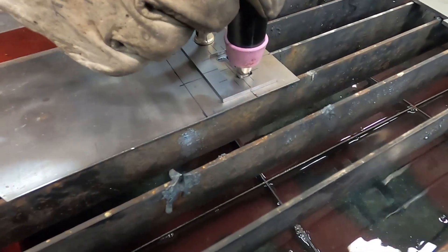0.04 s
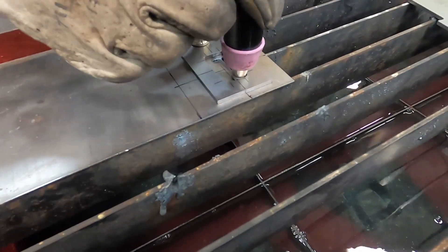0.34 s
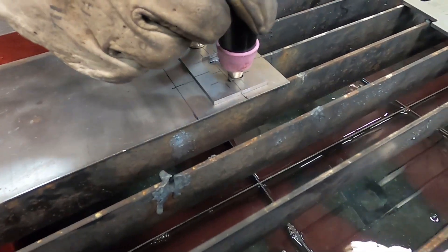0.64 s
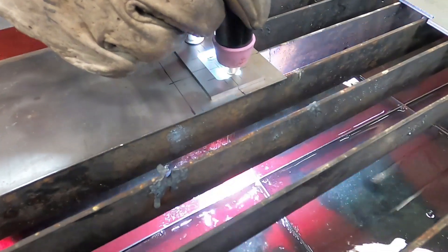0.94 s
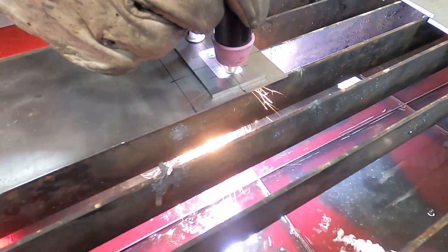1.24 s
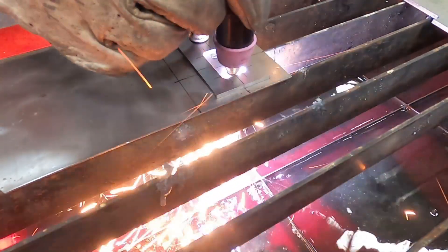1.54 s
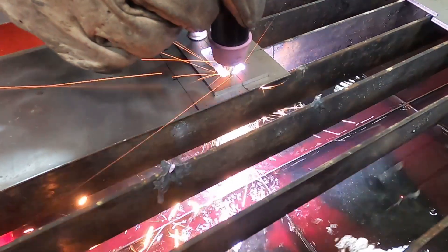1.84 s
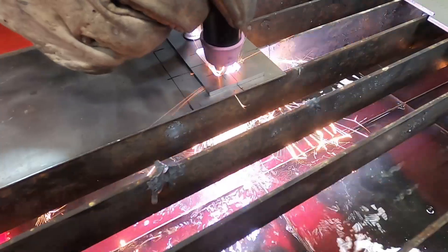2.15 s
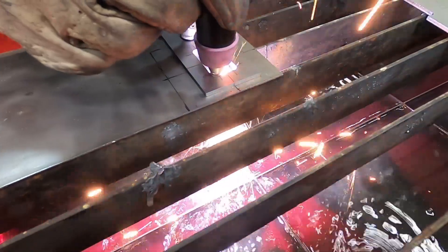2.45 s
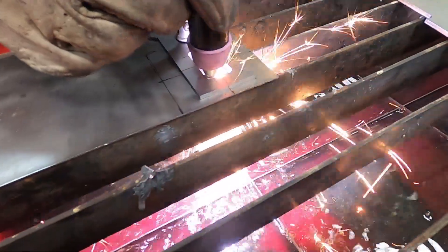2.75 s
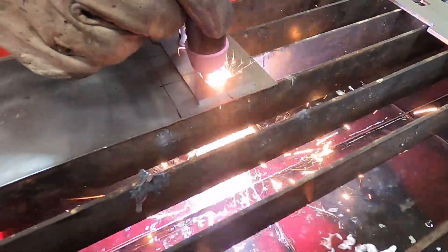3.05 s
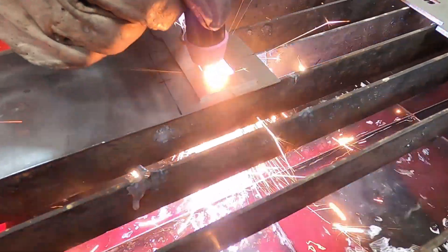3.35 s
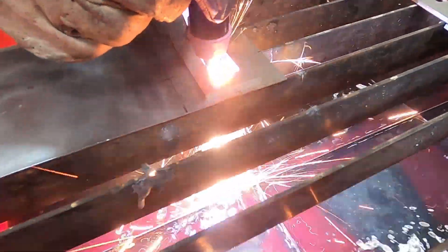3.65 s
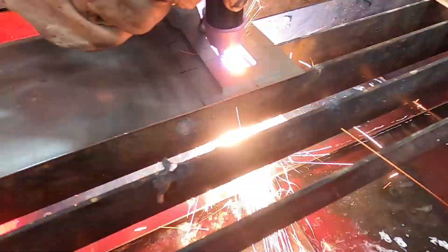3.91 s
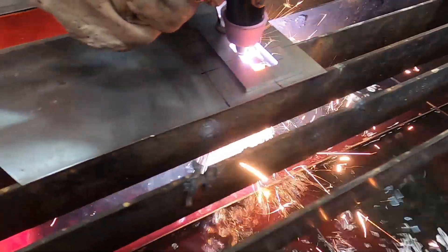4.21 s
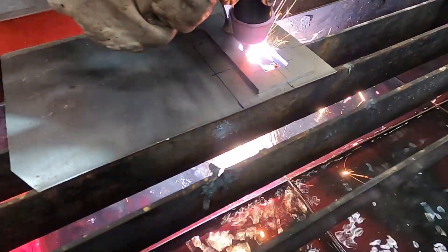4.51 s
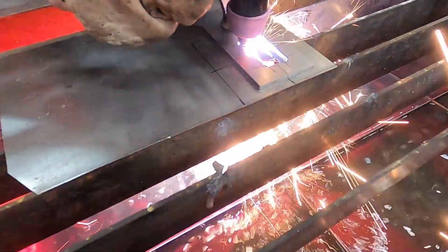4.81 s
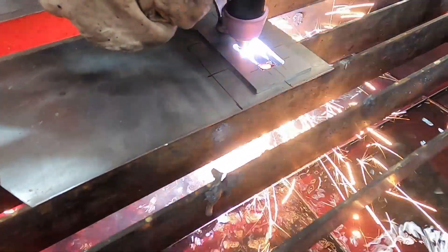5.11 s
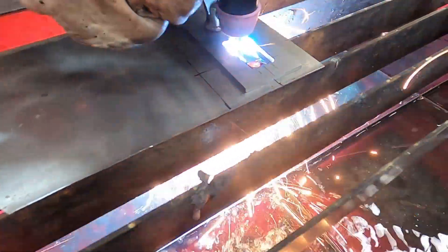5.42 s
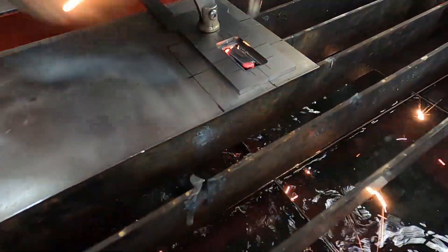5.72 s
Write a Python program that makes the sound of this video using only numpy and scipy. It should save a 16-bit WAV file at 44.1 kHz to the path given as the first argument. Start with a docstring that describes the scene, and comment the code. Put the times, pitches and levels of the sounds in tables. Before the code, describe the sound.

After a few clicks, a close plasma torch strikes and cuts metal with a loud, steady hiss, ending in a pop and duller air hiss.

```python
"""A handheld plasma cutter on steel plate, heard in stereo from close beside the slatted cutting table.
The machine's fan drones, trigger and air valve click, and the arc strikes with a stutter of pops.
The hot jet hisses through the gap under the nozzle and between the slats; its colour changes as it
pierces the plate and as the torch turns a corner. The arc goes out with a pop and cold air swells back."""
import sys
import numpy as np
from scipy import signal
from scipy.fft import rfft, irfft, next_fast_len
from scipy.io import wavfile
from scipy.ndimage import uniform_filter1d, map_coordinates

SR = 44100
rng = np.random.default_rng(int(sys.argv[2]) if len(sys.argv) > 2 else 0)


def store_pcm(level_fs):
    """Save levels as 16-bit WAV."""
    pcm = np.round(np.clip(level_fs, -1, 1) * 32767).astype(np.int16)
    wavfile.write(sys.argv[1], SR, np.atleast_2d(pcm).T)


N = 254456
ARC_ON_S, PIERCED_S, CORNER_S, ARC_OFF_S = 0.937, 1.31, 4.01, 5.646


def amp(db):
    """Decibels to gain."""
    return 10 ** (np.asarray(db) / 20)


def unit(x):
    """Scaled to rms 1."""
    return x / np.sqrt(np.mean(x ** 2) + 1e-20)


def along(points, hz):
    """(f/Hz, value) points read on a log axis."""
    f, v = np.transpose(points)
    return np.interp(np.log(hz + 1), np.log(f + 1), v)


def clock():
    """The time of each sample."""
    return np.arange(N) / SR


def step(x, centre, width):
    """A smooth rise from 0 to 1."""
    return .5 + .5 * np.tanh((x - centre) / width)


def bump(x, centre, width):
    """A bell of height 1."""
    return np.exp(-.5 * ((x - centre) / width) ** 2)


def wobble(rate):
    """A smooth random curve, rate knots per second."""
    return map_coordinates(rng.standard_normal(int(N * rate / SR) + 4), [clock() * rate])


def filtered(x, response):
    """x times a response of frequency."""
    m = next_fast_len(x.shape[-1] + SR // 4)
    return irfft(rfft(x, m) * response(np.fft.rfftfreq(m, 1 / SR)), m)[..., :x.shape[-1]]


def noise(spectrum, n):
    """n samples of noise at rms 1, shaped by (f/Hz, level/dB) points."""
    return unit(filtered(rng.standard_normal(n), lambda hz: amp(along(spectrum, hz))))


def add(track, s, sound):
    """Mix a sound into the track at s seconds."""
    part = track[round(s * SR):][:len(sound)]
    part += sound[:len(part)]


def ring(modes, t):
    """Damped modes, struck at slightly new strengths."""
    return sum(amp(db + rng.standard_normal() - 60 * t / t60) * np.sin(2 * np.pi * hz * t)
               for hz, db, t60 in modes)


def turbulence(colour, patchy_db, size=2048, apart_hz=11100):
    """Stereo noise under a moving colour(hz, t) in dB, with narrow patches that come and go."""
    hz, t, spectra = signal.stft(rng.standard_normal((2, N)), SR, nperseg=size)
    hz = hz[:, None]
    patches = uniform_filter1d(rng.standard_normal(spectra.shape[1:]), size=5, axis=0)
    patches = uniform_filter1d(patches, size=16, axis=1, mode="wrap")
    spectra = spectra * amp(colour(hz, t) + patchy_db * unit(patches))
    # only the shortest waves differ between the two microphones
    spectra[1] *= step(hz, apart_hz, 420)
    mid, side = signal.istft(spectra, SR, nperseg=size)[1][:, :N]
    return np.array([mid + side, mid - side])


# spectrum of the fan's rush: f/Hz, level/dB
FAN_SPECTRUM = [(25, -26), (48, -10), (110, -9), (160, -8), (250, -4.5), (400, -3), (550, -5.5),
                (700, -9.5), (1100, -14.5), (1900, -11), (2700, -17.5), (5000, -25), (8000, -41),
                (14000, -60)]
def fan_colour(hz, t, case_hz=285, case_db=10, blade_db=12):
    """The rush of the fan, with a resonance of the case and a blade note climbing to full speed (dB)."""
    blade_hz = np.minimum(392 + 68 * t, 472)
    return along(FAN_SPECTRUM, hz) + case_db * bump(hz, case_hz, 19) + blade_db * bump(hz, blade_hz, 28)


# hum of the power unit: f/Hz, level/dB relative to the fan's drone
POWER_HUM = [(48.4, -26), (96.9, -19), (296, -21), (457.6, -9), (630, -16)]
def machine(drone_db=-42.3, hiss_db=-50.0):
    """The cooling fan and the slightly unsteady hum of the power unit, faint behind the torch."""
    t = clock()
    # drone and hum swell once, then recede as the arc burns; the hiss above them stays even
    level_db = drone_db + 6.5 * bump(t, .73, .11) - 8.5 * step(t, ARC_ON_S, .1)
    rush = turbulence(fan_colour, patchy_db=1.2)
    drone = filtered(rush, lambda hz: 1 - step(hz, 750, 100))
    hum = sum(amp(db + 0.8 * wobble(3.5)) * np.sqrt(2) * np.sin(2 * np.pi * hz * t + 0.79 * wobble(9.2))
              for hz, db in POWER_HUM)
    return amp(level_db) * (unit(drone) + hum) + amp(hiss_db) * unit(rush - drone)


# resonance of the gap between nozzle and plate: t/s, f/Hz, boost/dB
NOZZLE_GAP = [(0.8, 2080, 9.5), (1.25, 2070, 11.5), (1.45, 2210, 11.5), (1.9, 2280, 11.5), (2.3, 2250, 10),
              (3.3, 2240, 11), (3.9, 2250, 14), (4.15, 2130, 12.5), (4.5, 2210, 7), (5.6, 2230, 9)]
def gap_resonance(hz, t, width_hz=120):
    """The hollow note under the nozzle follows the height at which the hand holds it (dB)."""
    times, centre_hz, boost_db = np.transpose(NOZZLE_GAP)
    return np.interp(t, times, boost_db) * bump(hz, np.interp(t, times, centre_hz), width_hz)


# spectrum of the cold jet: f/Hz, level/dB
AIR_SPECTRUM = [(50, -34), (180, -23), (500, -2.5), (900, -4.5), (1300, -4), (2000, 4.5), (2900, -1),
                (3500, 2), (5000, -1), (7000, -8.5), (8500, -18.5), (9200, -9.5), (12000, -21),
                (15000, -45)]
def air_jet(gain_db=-10.5, valve_open_s=.79, fill_s=0.046, reflow_share=0.28, reflow_s=.11):
    """Cold air, duller and smoother: the valve opens, the hose fills, the flow returns after the arc."""
    t = clock()
    opening_hiss = amp(-36.5 - 177 * np.maximum(t - .02, 0))  # faint air fades out at the start
    filling = 1 - np.exp(-np.maximum(t - valve_open_s, 0) / fill_s)
    reflow = reflow_share ** np.clip(1 - (t - ARC_OFF_S) / reflow_s, 0, 1)
    flow = np.where(t < (ARC_ON_S + ARC_OFF_S) / 2, filling ** 1.5, reflow)
    # at the end the torch is lifted, so the gap no longer rings
    colour = lambda hz, s: along(AIR_SPECTRUM, hz) + (s < ARC_OFF_S) * gap_resonance(hz, s)
    return (opening_hiss + amp(gain_db) * flow) * turbulence(colour, patchy_db=1.0)


# modes of the torch: f/Hz, level/dB, t60/s
TORCH_MODES = [(1940, -3, 0.05), (2230, -4, 0.026), (2600, -5, 0.018), (4600, -9, 0.019),
               (8100, -36, 0.023)]
# contacts of trigger, valve and nozzle: t/s, body gain/dB, tick gain/dB, thud gain/dB
CONTACTS = [(0.139, -42, -70, -60), (0.2576, -31.5, -68, -54), (0.4974, -60, -52, -60),
            (0.549, -55, -49, -60), (0.7174, -62, -58, -60), (0.7805, -20.5, -28, -48),
            (0.8022, -20.5, -38, -17.5)]
def clicks():
    """Each contact rings the torch near the microphones, with a dry crack, bright tick and soft thud."""
    out, t = np.zeros(N), np.arange(SR // 5) / SR
    attack = 1 - np.exp(-t / 0.0003)
    for s, body_db, tick_db, thud_db in CONTACTS:
        crack = noise([(150, -32), (600, 10), (2200, -1), (5000, -11), (12000, -42)], len(t))
        bright = unit(filtered(rng.standard_normal(len(t)), lambda hz: bump(hz, 8200, 1900)))
        tick = bright * amp(tick_db - 8.0 - 60 * t / .045)
        body = amp(body_db) * (ring(TORCH_MODES, t) + 0.46 * crack * amp(-60 * t / 0.05))
        thud = amp(thud_db - 60 * t / 0.043) * (1 - np.exp(-t / .003)) * np.sin(2 * np.pi * 190 * t)
        add(out, s, attack * (body + thud + tick))
    return out


def stage_shares(t):
    """The share of piercing, first side and second side of the cut at the times t."""
    through, turned = step(t, PIERCED_S, 0.064), step(t, CORNER_S, 0.034)
    return np.array([1 - through, through - turned, turned])


# resonances between plate and slats at each stage: f/Hz, half width/Hz, boost/dB
PIERCING_MODES = [(1400, 45, 4), (1635, 65, 11.5), (2600, 220, 8), (3420, 53, 5.5), (3590, 22, 12),
                  (3860, 110, 5), (4270, 38, 9), (4450, 46, 10), (4800, 71, 8.5), (6600, 100, 5.5),
                  (7000, 120, 5), (9160, 54, 6)]
FIRST_SIDE_MODES = [(1034, 52, 3.1), (1393, 42, 6.3), (1775, 113, 6.9), (2670, 90, 7.2), (3245, 26, 6.5),
                    (3380, 22, 5.3), (3645, 24, 6.5), (3980, 150, 1.9), (4490, 76, 4.2), (6020, 65, 6.7),
                    (6830, 88, 7.6), (7470, 77, 6.9), (9070, 170, 3.1)]
SECOND_SIDE_MODES = [(1115, 69, 5.5), (1436, 34, 7.4), (2563, 67, 7.3), (2910, 165, 4.1), (3560, 43, 2.9),
                     (4220, 170, 3.9), (6010, 410, 3.6), (9400, 560, 5.9)]
# whistles on the edges of the cut: t/s, half length/s, f/Hz, boost/dB
EDGE_WHISTLES = [(1.15, 0.18, 2640, 4), (2.4, .25, 5000, 4.5), (2.446, 0.26, 4540, 5.5),
                 (3.17, .17, 4080, 4.5), (3.3, .13, 2780, 6), (3.85, 0.13, 2670, 6), (3.87, 0.07, 7700, 10),
                 (3.98, 0.11, 7160, 5), (4.458, 0.13, 5900, 7.5), (4.656, 0.1, 4200, 9),
                 (5.197, 0.11, 4570, 10)]
def cut_resonances(hz, t, slot_db=7.5):
    """The jet sounds the cavities under the plate, the slot it cuts and the edges it catches (dB)."""
    shares = stage_shares(t)
    cavities = sum(share * sum(db * bump(hz, centre, width) for centre, width, db in modes)
                   for share, modes in zip(shares, (PIERCING_MODES, FIRST_SIDE_MODES, SECOND_SIDE_MODES)))
    slot_hz = 2846 + 220 * np.maximum(t - CORNER_S, 0)  # climbs along the second side
    slot = slot_db * shares[-1] * bump(hz, slot_hz, 70)
    whistles = sum(db * bump(t, s, half) * bump(hz, centre, 85) for s, half, centre, db in EDGE_WHISTLES)
    return cavities + slot + whistles


# spectrum of the burning jet: f/Hz, level/dB
ARC_SPECTRUM = [(50, -37.5), (160, -13.5), (550, -4.5), (850, -5.5), (1300, -7), (2000, -1), (3500, -0.17),
                (5500, -3), (8000, -5.5), (8650, -10), (9150, -5.5), (11200, -7.5), (12500, -15),
                (15600, -38)]
# piercing, first side and second side: level/dB, extra roar/dB, extra sizzle/dB
CUT_STAGES = [(-10.6, .3, -2.5), (-11.5, -2.5, -2.5), (-11.5, -3.5, -3.3)]
# spurts and lulls of molten steel: t/s, half length/s, extra roar/dB, extra sizzle/dB
STEEL_SPURTS = [(2.15, .12, 1.3, 0.8), (3.15, .16, 1.5, 0.5), (4.027, 0.02, 2.5, 3),
                (4.82, 0.041, -3.5, .5), (4.99, .06, 3, -1), (5.214, 0.054, 0, 2)]
def arc_jet():
    """The plasma hiss at close range, fluttering as molten steel is blown out of the cut."""
    stage_db, stage_roar_db, stage_sizzle_db = np.transpose(CUT_STAGES)

    def colour(hz, t):
        past_corner = np.maximum(t - CORNER_S, 0)  # along the second side the hiss broadens
        roar_db = stage_roar_db @ stage_shares(t) + 2.0 * past_corner
        sizzle_db = stage_sizzle_db @ stage_shares(t) + 1.5 * past_corner
        for s, half, low_db, high_db in STEEL_SPURTS:
            roar_db += low_db * bump(t, s, half)
            sizzle_db += high_db * bump(t, s, half)
        balance = roar_db * (1 - step(hz, 1450, 200)) + sizzle_db * step(hz, 6800, 1300)
        return along(ARC_SPECTRUM, hz) + gap_resonance(hz, t) + cut_resonances(hz, t) + balance

    t = clock()
    dip_db = 4.8 * bump(t, 0.98, .014)  # the hiss dips briefly after the strike
    dwell_db = 1.9 * bump(t, 4.4, .08)  # the torch slows and the jet grows louder
    flutter_db = 0.35 * wobble(25) + 0.29 * wobble(140)
    level_db = stage_db @ stage_shares(t) - dip_db + dwell_db + flutter_db
    return amp(level_db) * turbulence(colour, patchy_db=2.1)


# pops as the arc strikes and dies: t/s, level/dB, half length/s, crack level/dB
ARC_POPS = [(0.9413, -11.5, 0.0013, -6.5), (0.9453, -3, 0.00069, -24), (0.952, -11, 0.00063, -15),
            (5.642, -7, 0.00053, -14)]
# modes of the pan under the table: f/Hz, level/dB, t60/s
PAN_MODES = [(191, -28, 0.63), (259.7, -18, 0.22), (328, -48, 0.06)]
def pops(boom_db=-2, bass_hz=110):
    """The gas expands or collapses at once: one pressure swing, a crack and a boom from the pan."""
    out, t = np.zeros(N), np.arange(SR // 2) / SR
    for s, db, half, crack_db in ARC_POPS:
        swing = (clock() - s) / half
        out += amp(db) * swing * np.exp((1 - swing ** 2) / 2)
        add(out, s, amp(db + boom_db) * ring(PAN_MODES, t))
        crack = noise([(300, -9), (1000, -3), (1700, 3), (4000, -17), (13000, -48)], len(t))
        add(out, s - .003, crack * amp(crack_db - 60 * t / 0.036))
    # the pops are heard with little deep bass
    return signal.sosfilt(signal.butter(2, bass_hz, "highpass", fs=SR, output="sos"), out)


def scene():
    """Beside the table: the hot jet takes the place of the cold one while the arc burns."""
    burning = step(clock(), ARC_ON_S, 0.0015) - step(clock(), ARC_OFF_S, 0.0032)
    return burning * arc_jet() + (1 - burning) * air_jet() + pops() + clicks() + machine()


def record(dry, top_hz=15780):
    """The close microphones round off the highest peaks and keep nothing above their band limit."""
    rounded = dry / (1 + np.abs(dry) ** 8) ** (1 / 8)
    return filtered(rounded, lambda hz: hz < top_hz)


dry = scene()
out = record(dry)
store_pcm(out)
```